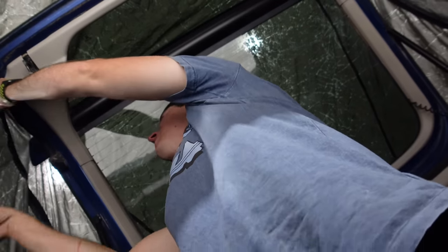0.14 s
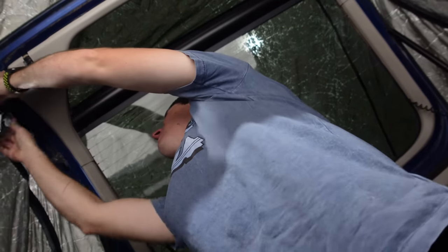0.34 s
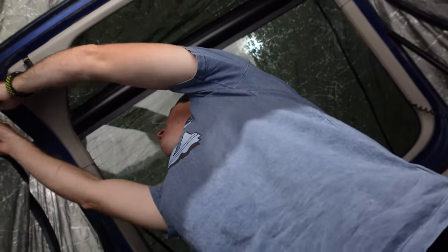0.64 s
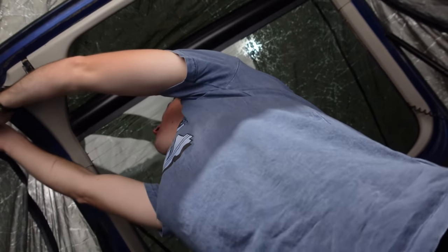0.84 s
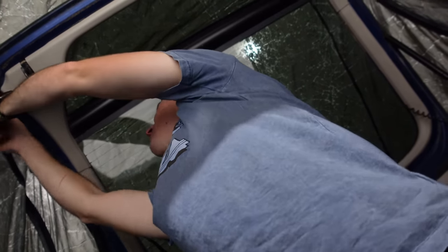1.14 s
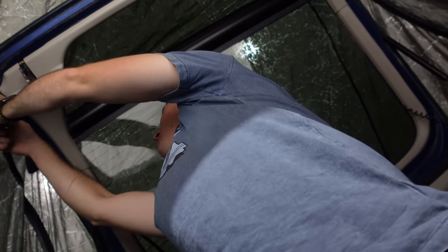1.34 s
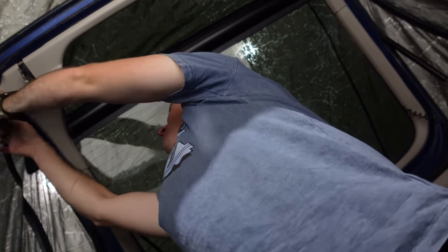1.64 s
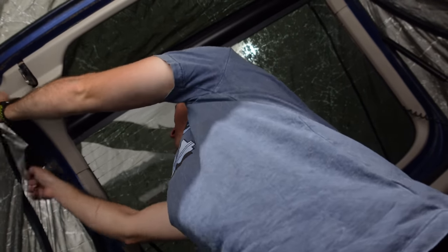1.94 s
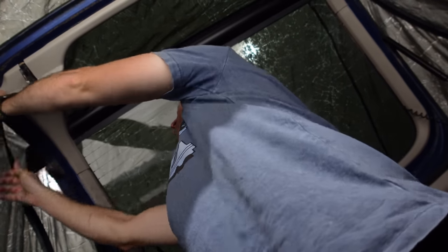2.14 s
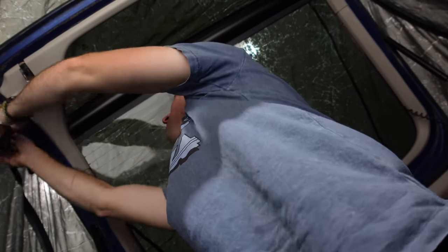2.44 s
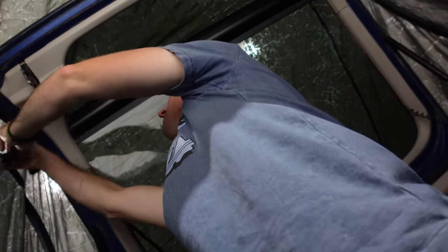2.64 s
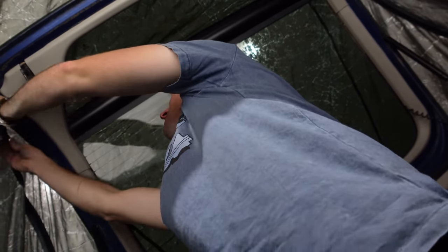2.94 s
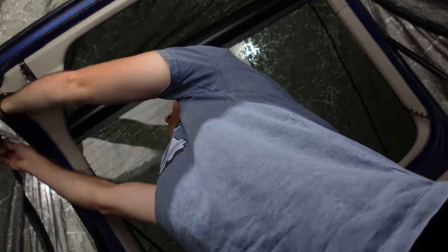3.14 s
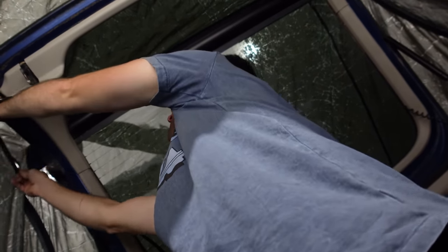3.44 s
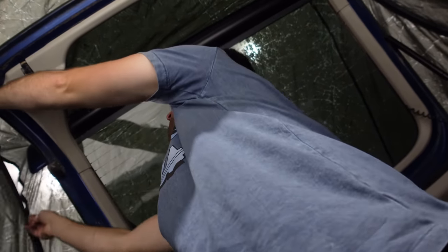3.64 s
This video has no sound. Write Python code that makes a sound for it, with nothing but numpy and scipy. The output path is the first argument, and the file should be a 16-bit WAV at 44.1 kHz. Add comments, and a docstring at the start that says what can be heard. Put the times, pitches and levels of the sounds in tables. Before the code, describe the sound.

A close tent zipper rasps briefly, then runs longer, between fabric bumps and metal clinks.

```python
"""A nylon tent window is unzipped close by, the slack wall swaying over a quiet garage throughout.
First hands brush and bump the fabric and the metal pull tabs clink. At 1.75 s comes one short tug: the
slider trips over the coil teeth, each plucking the taut panel and rasping in the slider. Louder bumps
and clinks follow, then more brushing. At 3.2 s a hesitant start runs into a long fast pull."""
import sys
import numpy as np
from scipy import signal
from scipy.fft import rfft, irfft, next_fast_len
from scipy.io import wavfile
from scipy.ndimage import uniform_filter1d

SR = 44100
rng = np.random.default_rng(int(sys.argv[2]) if len(sys.argv) > 2 else 0)


def master_out(mix):
    """Clip the mix to full scale and print it as 16-bit PCM to the path in sys.argv[1]."""
    frames = np.transpose(np.atleast_2d(mix))
    ceiling = np.clip(frames, -1, 1)
    pcm = np.round(ceiling * 32767).astype(np.int16)
    wavfile.write(sys.argv[1], SR, pcm)


N = 167580

# slider speed per pull: time_s, teeth_per_s
TUG_RATE = [(1.745, 170), (1.765, 282), (1.8, 380), (1.83, 450), (1.862, 470), (1.885, 310), (1.905, 123),
            (1.925, 66)]
START_RATE = [(3.2, 130.6), (3.215, 271.8), (3.245, 367), (3.275, 240.7), (3.3, 69)]
RUN_RATE = [(3.345, 110.4), (3.382, 269.3), (3.42, 327), (3.443, 387.4), (3.475, 296.6), (3.5, 369.2),
            (3.516, 400.2), (3.526, 794.6), (3.552, 662.8), (3.6, 572.4), (3.65, 614.5), (3.71, 640),
            (3.76, 663), (3.8, 660)]
# force per pull: time_s, panel_db, rasp_db
TUG_FORCE = [(1.745, -33, -57), (1.763, -29.5, -42.5), (1.827, -30, -35.5), (1.861, -26.5, -34.5),
             (1.915, -35, -41), (1.925, -27, -44)]
START_FORCE = [(3.19, -37.5, -43), (3.23, -36.5, -33), (3.25, -33, -36), (3.3, -37, -50)]
RUN_FORCE = [(3.36, -32, -35), (3.426, -24, -28), (3.456, -22, -29), (3.47, -19.5, -30.5),
             (3.51, -22.5, -34.5), (3.524, -17.5, -29), (3.558, -31.5, -26.5), (3.594, -24.5, -27),
             (3.614, -34, -28), (3.64, -25, -28), (3.8, -26.5, -28.5)]
# catching teeth: start_s, level_db
CATCHES = [(1.725, -30), (1.924, -35), (3.1925, -27), (3.294, -32), (3.316, -23), (3.3294, -19.5),
           (3.3418, -22), (3.351, -21), (3.366, -25)]

def zipper():
    """Three pulls; single teeth catch and let go as the slider starts and stops."""
    catches = colour(noise() * sum(undb(db) * fall(s, decay_s=0.0011) for s, db in CATCHES), RASP_EQ)
    tug = pull(TUG_RATE, TUG_FORCE, sizzle_db=-15.5)
    start = pull(START_RATE, START_FORCE, sizzle_db=-28)
    run = pull(RUN_RATE, RUN_FORCE, sizzle_db=-22)
    return catches + tug + start + run


def pull(rate, force, sizzle_db, burst_s=0.00099, waver_db=2.94, panel_trim_db=-1, rasp_trim_db=0.83):
    """Each tooth plucks the panel and sets off a short rasp in the slider."""
    moving = (clock() >= rate[0][0]) & (clock() <= rate[-1][0])
    plucks = teeth(rate)
    bursts = unit(signal.lfilter([1], [1, -np.exp(-1 / (burst_s * SR))], plucks), moving)
    panel = taut_panel(plucks, bursts, curve(rate), moving)
    panel *= undb(panel_trim_db + curve(force) + waver_db * walk(105))
    rasp = slider_rasp(bursts, moving, sizzle_db)
    return panel + rasp * undb(rasp_trim_db + curve(force, column=2))


def teeth(rate, scatter_db=0.5, slow_hz=239.6):
    """One impulse per coil tooth; a slow slider moves unevenly."""
    times_s, rates_hz = np.array(rate).T
    plucks, when_s = np.zeros(N + 2), times_s[0]
    for late, strong in rng.standard_normal((N // 100, 2)):
        if when_s * SR >= N or when_s > times_s[-1]:
            break
        hz = np.interp(when_s, times_s, rates_hz)
        i, part = int(when_s * SR), when_s * SR % 1
        plucks[i:i + 2] += undb(scatter_db * strong) * np.sqrt(SR / hz) * np.array([1 - part, part])
        jitter = 0.03 + 0.1307 * np.exp(-(hz / slow_hz) ** 2)
        when_s += np.exp(late * jitter) / hz
    return plucks[:N]


# panel resonances: pitch_hz, decay_s, level_db
PANEL_MODES = [(369, 0.0055, 0.5), (450, 0.0047, -9), (828, 0.0061, -8.5), (903, 0.0035, -1.5),
               (1049, 0.0031, -3.5), (1540, 0.0023, -8), (1845, 0.0015, -18.5)]
# panel whine: freq_hz, gain_db
WHINE_EQ = [(60, -27), (170, -8.5), (290, 2.5), (390, 8), (480, 9.5), (620, -1), (760, -5.5), (900, -4),
            (1080, -7), (1300, -2), (1600, -7), (1900, -5.5), (2600, -14), (4000, -19), (9000, -29.5)]

def taut_panel(plucks, bursts, rate_hz, moving, outrun_hz=480, ring_db=-0.5, slow_whine_db=-8):
    """Teeth keep the panel ringing; a fast slider outruns its resonances, leaving a thinner whine."""
    slow = 1 / (1 + (rate_hz / outrun_hz) ** 6)
    rough_plucks = unit(plucks, moving) + 0.55 * bursts * noise()
    ringing = unit(signal.fftconvolve(rough_plucks, ring(0, PANEL_MODES))[:N], moving)
    ringing *= undb(ring_db) * np.sqrt(slow)
    whine = unit(colour(disperse(plucks), WHINE_EQ), moving)
    whine *= np.sqrt(1 - slow + slow * undb(slow_whine_db) ** 2)
    return signal.sosfilt(signal.butter(2, 110, "high", fs=SR, output="sos"), ringing + whine)


def disperse(x, smear_s=0.003043, corner_hz=2053):
    """Cloth carries low notes more slowly than high ones, smearing each pluck."""
    delay_s = smear_s / (1 + np.fft.rfftfreq(N, 1 / SR) / corner_hz)
    return irfft(rfft(x) * np.exp(-2j * np.pi * np.cumsum(delay_s) * SR / N), N)


# bite of the coil: time_s, ring_share
BITE = [(3.39, 0), (3.41, 0.43), (3.46, 0.52), (3.51, 0), (3.56, 0)]
# tooth rasp, slider ring, fine coil hiss: freq_hz, gain_db
RASP_EQ = [(100, 6), (300, 0), (900, 7.5), (1500, -2), (2300, 2), (3200, 2), (4000, 0.5), (5100, 1),
           (6700, -3), (8400, -0.5), (9800, -6), (11500, -13.5), (13800, -17), (16000, -36)]
SLIDER_EQ = [(2000, -45), (4400, -7.5), (4950, 2.5), (5350, 0.5), (5900, -7), (6700, -6), (7700, -1),
             (8450, -3.5), (9100, -12), (10000, -13), (16000, -28)]
SIZZLE_EQ = [(9000, -30), (11300, -7), (12300, 0), (13800, 0), (14700, -7), (16000, -14)]

def slider_rasp(bursts, moving, sizzle_db):
    """Teeth scrape through the slider, which rings where the coil bites hard."""
    bite = curve(BITE)
    scrape = bursts + 0.39 * moving
    rasp = unit(colour(scrape * noise(), RASP_EQ), moving)
    ringing = unit(colour(bursts * noise(), SLIDER_EQ), moving)
    sizzle = unit(colour(scrape * noise(), SIZZLE_EQ), moving)
    return np.sqrt(1 - bite) * rasp + np.sqrt(bite) * ringing + undb(sizzle_db) * sizzle


# fabric knocks and snaps: start_s, thud_db, crackle_db, crackle_decay_s
BUMPS = [(.021, -31, -43, 0.0048), (0.269, -27.5, -41, 0.0038), (0.296, -36.5, -49, 0.0042),
         (.374, -38.5, -35, 0.003), (.606, -34.5, -44, 0.002), (0.629, -37, -42, 0.0068),
         (.668, -20, -23.5, 0.008), (0.729, -52, -41.5, 0.0075), (.7965, -62, -40, 0.0024),
         (.838, -43, -52, 0.01), (.949, -39.5, -47, 0.0091), (1.107, -33.5, -54, 0.0029),
         (1.23, -45, -49, 0.0086), (1.449, -40, -31.5, 0.013), (1.521, -39.5, -31, 0.007),
         (1.687, -37, -30.5, 0.0057), (1.751, -43, -34.5, 0.024), (1.966, -25, -20, 0.009),
         (1.982, -31, -21, 0.0073), (2.024, -42, -36.5, 0.0067), (2.089, -33, -39, 0.0034),
         (2.123, -16, -20.5, 0.011), (2.158, -19, -22.5, .007), (2.172, -33, -28, 0.0037),
         (2.478, -33, -33, 0.0057), (2.669, -37.5, -38.5, 0.013), (3.131, -32, -42.5, 0.022),
         (3.148, -32, -53, 0.011)]
# crackling folds: freq_hz, gain_db
CRACKLE_EQ = [(60, -5), (200, 0.5), (450, 7.5), (800, 4), (1300, 1), (2000, -3), (3200, -8.5), (5000, -17),
              (9000, -25), (16000, -48)]

def bumps(rise_s=0.0008):
    """Knocked or snapped taut, the wall thuds and its folds crackle."""
    thuds = sum(undb(db) * thud(s) for s, db, _, _ in BUMPS)
    folds = sum(undb(db) * (fall(s, decay_s) - fall(s, rise_s)) for s, _, db, decay_s in BUMPS)
    return thuds + colour(noise() * folds, CRACKLE_EQ)


def thud(start_s, onset_hz=251.3, sag_s=0.007, decay_s=0.0087, flap_db=-9.5, flap_s=0.11):
    """A bending wave in the wall: high notes arrive first, then it sinks into a slow flap."""
    age = np.maximum(clock() - start_s, 0)
    turns = onset_hz * sag_s * np.log1p(age / sag_s)
    envelope = np.exp(-age / decay_s) + undb(flap_db) * np.exp(-age / flap_s)
    return -np.sin(2 * np.pi * turns) * envelope


# finger taps: start_s, level_db
TAPS = [(.020, -26.5), (0.269, -30.5), (0.3728, -20), (1.671, -23.5), (2.0883, -19.5)]
# tap resonances: pitch_hz, decay_s, level_db
TAP_MODES = [(545, 0.0014, -8.5), (900, 0.00074, -1.5), (1390, 0.00021, -15)]

def finger_taps():
    """Fingers strike the wall with light, dull taps."""
    return sum(undb(db) * ring(s, TAP_MODES) for s, db in TAPS)


# tab contacts: start_s, ring_db, tick_db, favoured_hz, decay_ratio (1 free, less when gripped)
CLINKS = [(.238, -54, -63, 11000, .8), (.257, -42, -44, 11000, .7), (0.513, -37.5, -60, 6700, 0.73),
          (.658, -46, -46, 10500, .6), (.711, -36, -62, 6750, 0.93), (0.759, -37, -60, 6960, 0.86),
          (.844, -52, -60, 10500, 0.87), (1.687, -34, -32, 10000, 0.53), (1.959, -22, -42, 8400, 0.78),
          (1.965, -17, -27, 8300, 0.63), (1.984, -28, -33, 13500, 0.47), (2.04, -37, -39, 11000, 0.65),
          (2.172, -24, -31.5, 5500, 0.66), (2.18, -24, -35, 10500, 0.69)]
# free tab resonances: pitch_hz, decay_s, level_db
TAB_MODES = [(4454, 0.0067, 0.5), (7460, .01, -15.5), (8350, .006, -11.5), (9700, .004, -9),
             (11010, .01, -6), (13550, .006, -9)]
# contact tick: freq_hz, gain_db
TICK_EQ = [(500, -13), (3000, -13), (6000, -4), (8500, 7), (10500, 9), (13500, -5), (16000, -14)]

def pull_tabs(db_per_octave=18.5):
    """Metal tabs tick and ring, each contact favouring the modes near one pitch."""
    rings, ticks = np.zeros((2, N))
    for s, ring_db, tick_db, favoured_hz, decay_ratio in CLINKS:
        modes = [(hz, decay_s * decay_ratio, db - db_per_octave * abs(np.log2(hz / favoured_hz)))
                 for hz, decay_s, db in TAB_MODES]
        rings += undb(ring_db) * ring(s, modes)
        ticks += undb(tick_db) * fall(s, decay_s=0.002)
    return rings + colour(noise() * ticks, TICK_EQ)


# hand strokes: start_s, length_s, level_db
BRUSHES = [(-.04, 0.07, -49.5), (0.106, 0.089, -55.5), (0.218, 0.071, -51), (0.32, 0.072, -44.5),
           (0.393, 0.068, -48), (0.782, 0.019, -49), (0.846, 0.033, -52), (0.941, .12, -57.5),
           (1.082, 0.031, -46), (1.225, 0.041, -52), (1.295, 0.12, -55), (1.414, .08, -52.5),
           (1.497, 0.088, -43), (1.583, 0.32, -50), (1.938, 0.059, -37), (2.028, 0.029, -39.5),
           (2.332, 0.11, -44.5), (2.433, .18, -46), (2.647, 0.094, -54), (2.793, 0.034, -44),
           (2.836, 0.08, -49.5), (2.891, 0.12, -46), (3.031, .08, -57), (3.126, 0.051, -47.5)]
# rubbed nylon: freq_hz, gain_db
NYLON_EQ = [(80, 5), (300, 6.5), (900, 3.5), (2000, 2), (3500, -1.5), (5500, -1), (7000, -3), (8500, -2.5),
            (11000, -10), (14000, -15), (16000, -26)]

def brushes(edge_s=0.025, grain_db=2.5, waver_db=2.5):
    """Skin slides over the weave: grainy hiss that swells, holds and fades."""
    t, power = clock(), np.zeros(N)
    for s, length_s, db in BRUSHES:
        inside_s = np.minimum(t - s, s + length_s - t)
        power += (undb(db) * np.clip(inside_s / edge_s + 0.5, 0, 1)) ** 2
    grain = unit(noise() * undb(grain_db * walk(1200) + waver_db * walk(39)))
    return colour(grain * np.sqrt(power), NYLON_EQ)


# wall sway: time_s, level_db
SWAY_LEVEL = [(0, -47.5), (.6, -43.5), (.72, -35), (.85, -43), (1.05, -40), (1.3, -45), (1.85, -45.5),
              (2.03, -31), (2.22, -40.5), (2.35, -39.5), (2.7, -43), (3.1, -39.5), (3.8, -38)]
# wall rumble, garage air: freq_hz, gain_db
SWAY_EQ = [(8, -10), (24, -3), (40, -12.5), (70, -19), (120, -22.5), (180, -27), (260, -37.5), (1000, -52),
           (16000, -140)]
GARAGE_EQ = [(60, -20), (140, 0), (335, -5.5), (755, -6), (1810, -10.5), (2430, -14.5), (7400, -19.5),
             (10500, -25.5), (14000, -31), (16000, -42)]

def background(air_db=-54.5):
    """Quiet garage air and the low rumble of the swaying wall."""
    air = undb(air_db) * colour(noise(), GARAGE_EQ)
    return air + undb(curve(SWAY_LEVEL)) * colour(noise(), SWAY_EQ)


def undb(db):
    """Decibels to gain."""
    return 10 ** (np.asarray(db) / 20)


def unit(x, span=slice(None)):
    """Scale to rms 1 within span."""
    return x / np.sqrt(np.mean(x[span] ** 2))


def clock():
    """Sample times in s."""
    return np.arange(N) / SR


def curve(table, column=1):
    """A column interpolated over time."""
    points = np.array(table)
    return np.interp(clock(), points[:, 0], points[:, column])


def noise():
    """White noise."""
    return rng.standard_normal(N)


def walk(hz):
    """Smooth random drift, rms 1."""
    width = int(SR / hz)
    return unit(uniform_filter1d(uniform_filter1d(noise(), width), width))


def colour(x, eq):
    """Minimum-phase filter that keeps the power of white noise."""
    size = next_fast_len(N + SR // 2)
    size += size % 2
    hz, db = np.array(eq, float).T
    bins_hz = np.fft.rfftfreq(size, 1 / SR)
    gain = unit(undb(np.interp(np.log(bins_hz + 1), np.log(hz), db)))
    cepstrum = irfft(np.log(gain))
    cepstrum[1:size // 2] *= 2
    cepstrum[size // 2 + 1:] = 0
    return irfft(rfft(x, size) * np.exp(rfft(cepstrum)))[:N]


def fall(start_s, decay_s):
    """Sudden onset, exponential decay."""
    age = clock() - start_s
    return (age >= 0) * np.exp(-np.clip(age / decay_s, 0, 50))


def ring(start_s, modes):
    """Damped sines struck together."""
    out, first = np.zeros(N), max(int(start_s * SR), 0)
    age = np.arange(min(SR // 2, N - first)) / SR
    for hz, decay_s, db in modes:
        out[first:first + len(age)] += undb(db) * np.exp(-age / decay_s) * np.sin(2 * np.pi * hz * age)
    return out


def scene(sliding_send_db=-6.5, knock_send_db=-13):
    """Close sources with the brief reflections of a small enclosed space; both channels alike."""
    sliding = zipper() + brushes()
    knocks = bumps() + finger_taps() + pull_tabs()
    echoes = noise() * fall(0.0024, decay_s=0.026)
    send = undb(sliding_send_db) * sliding + undb(knock_send_db) * knocks
    tent = signal.fftconvolve(send, echoes / np.linalg.norm(echoes))[:N]
    return np.tile(sliding + knocks + tent + background(), (2, 1))


def record(dry):
    """Steep low-pass at 15.9 kHz."""
    return signal.sosfilt(signal.ellip(10, 0.2, 80, 15900, fs=SR, output="sos"), dry)


dry = scene()
out = record(dry)
master_out(out)
```